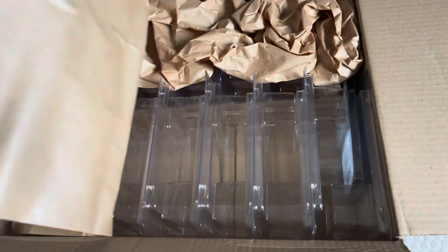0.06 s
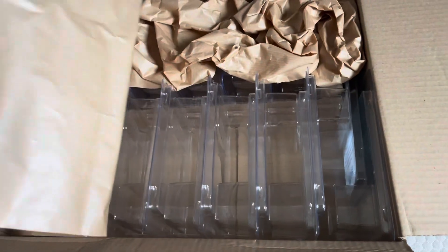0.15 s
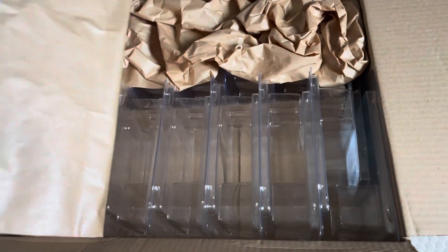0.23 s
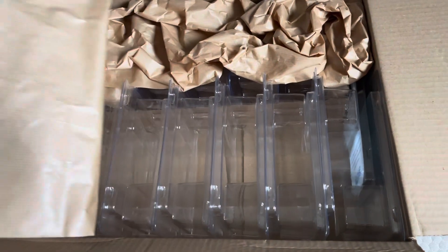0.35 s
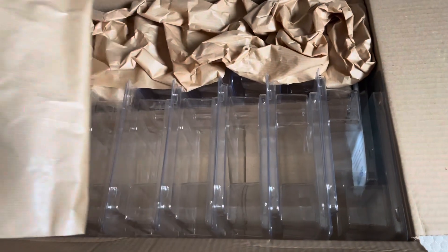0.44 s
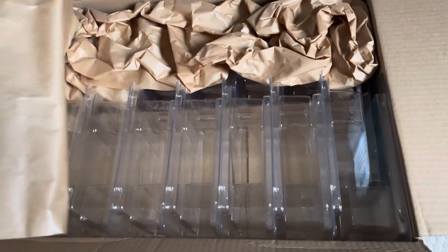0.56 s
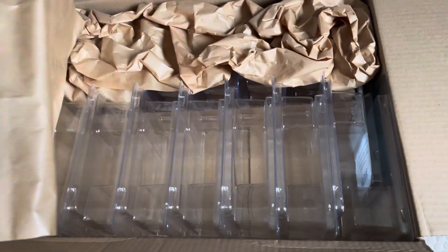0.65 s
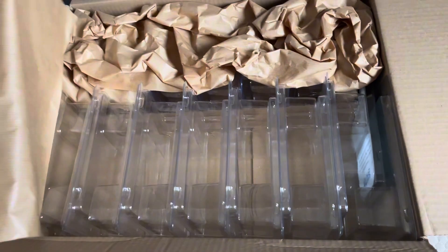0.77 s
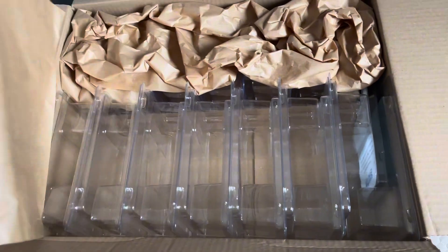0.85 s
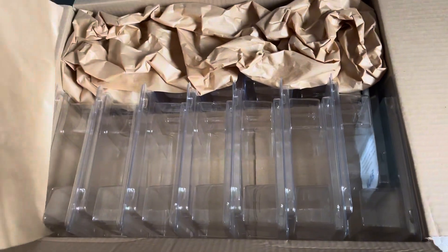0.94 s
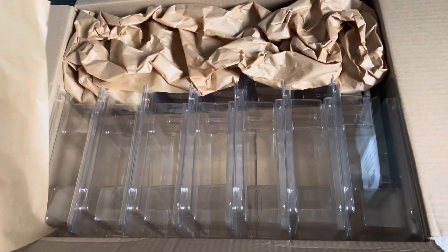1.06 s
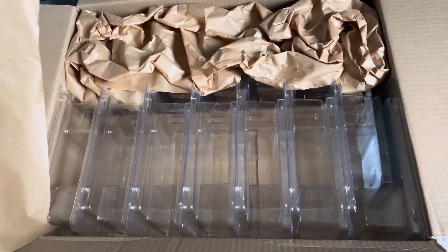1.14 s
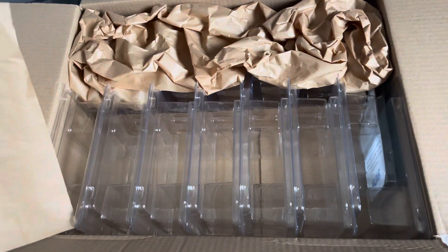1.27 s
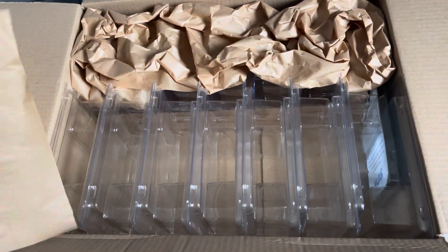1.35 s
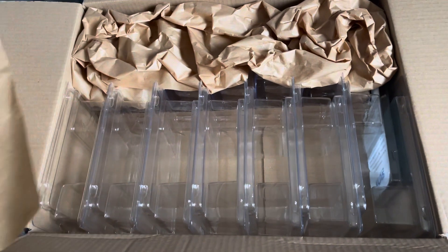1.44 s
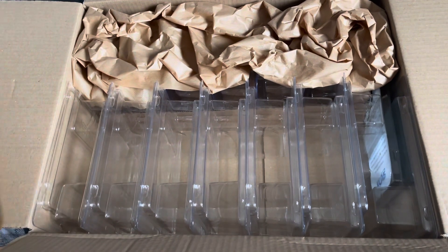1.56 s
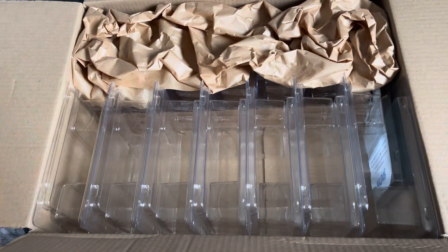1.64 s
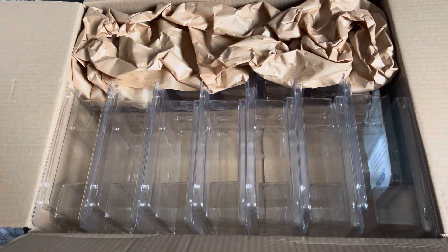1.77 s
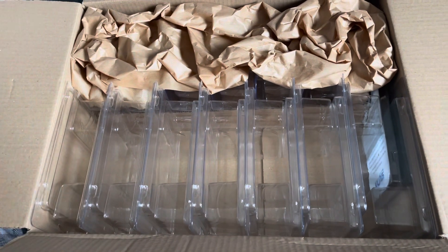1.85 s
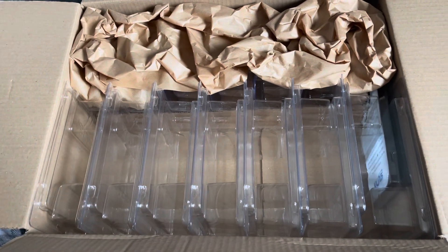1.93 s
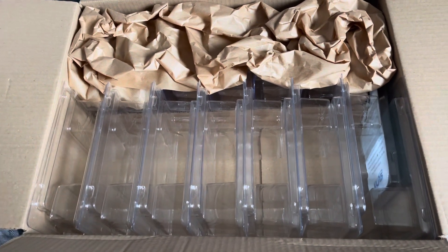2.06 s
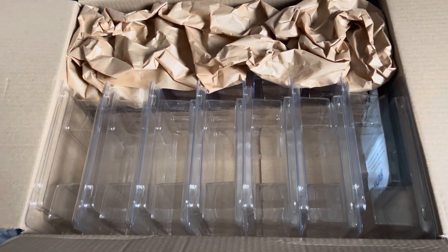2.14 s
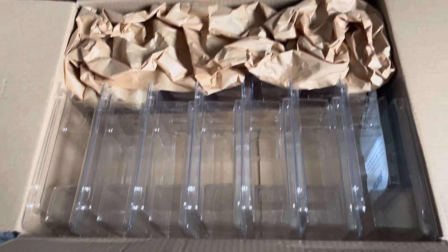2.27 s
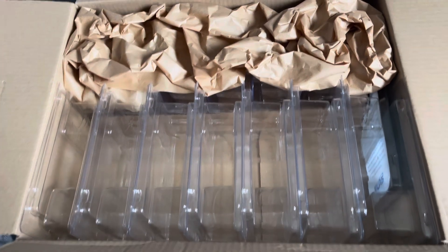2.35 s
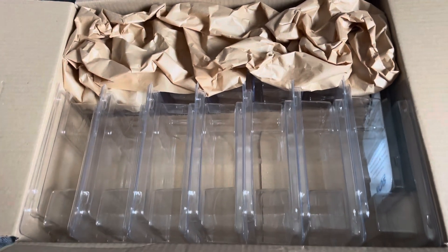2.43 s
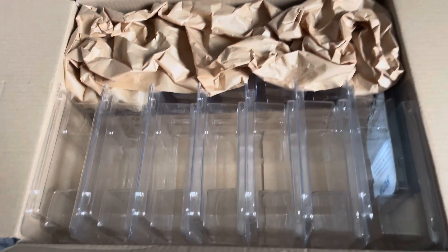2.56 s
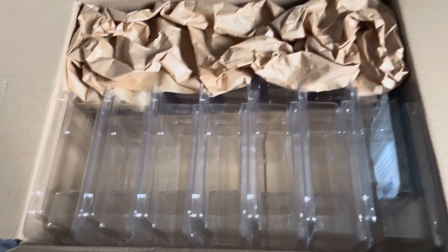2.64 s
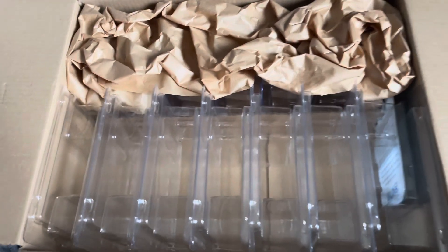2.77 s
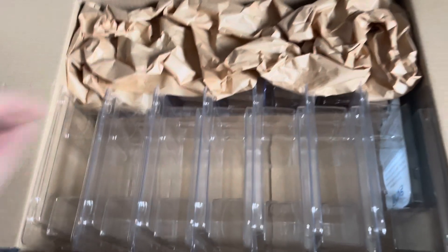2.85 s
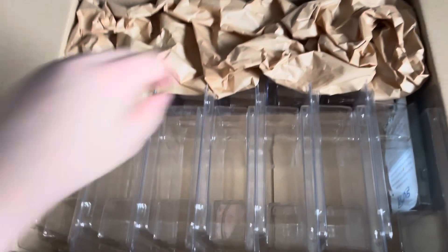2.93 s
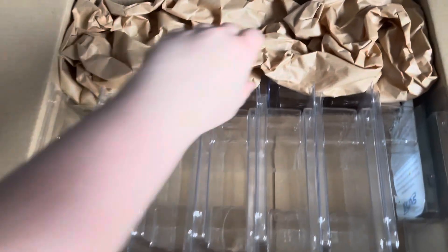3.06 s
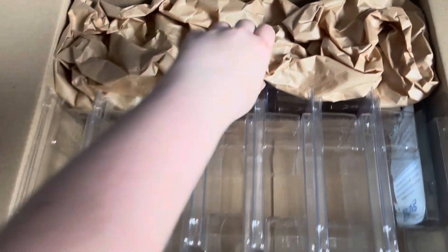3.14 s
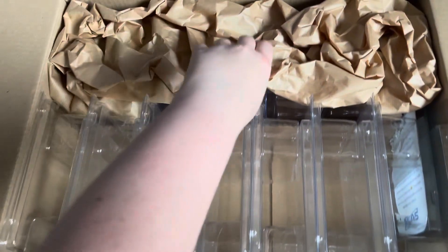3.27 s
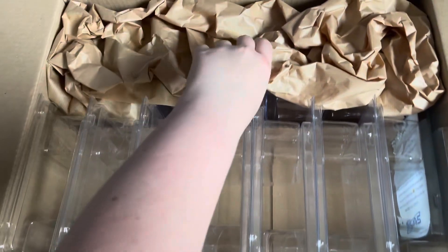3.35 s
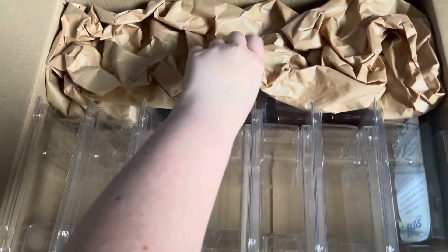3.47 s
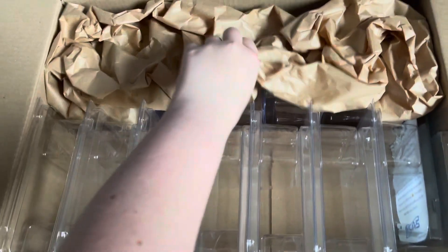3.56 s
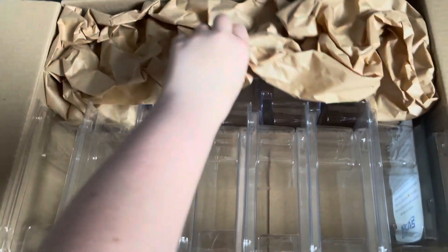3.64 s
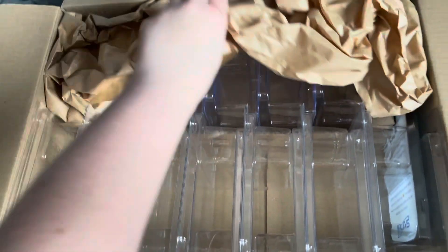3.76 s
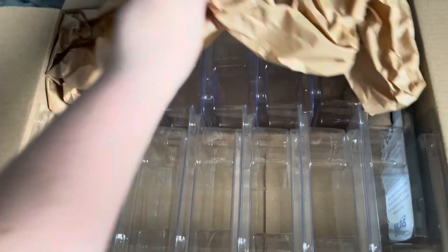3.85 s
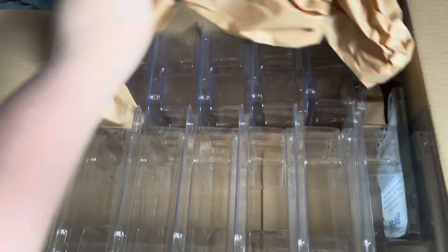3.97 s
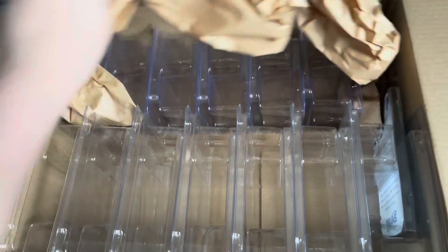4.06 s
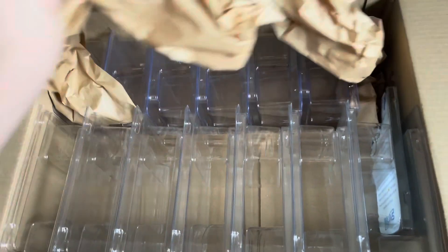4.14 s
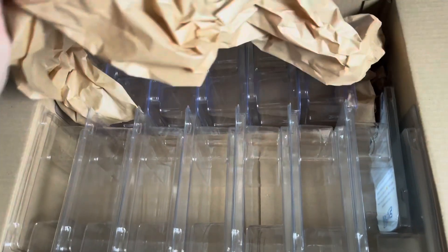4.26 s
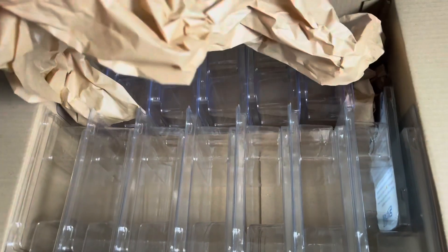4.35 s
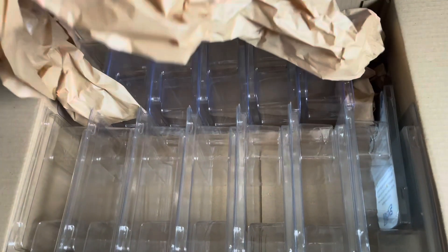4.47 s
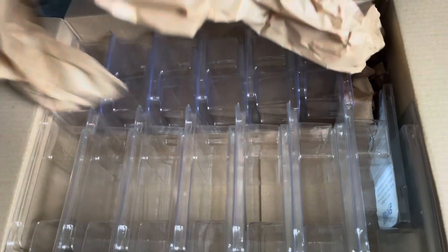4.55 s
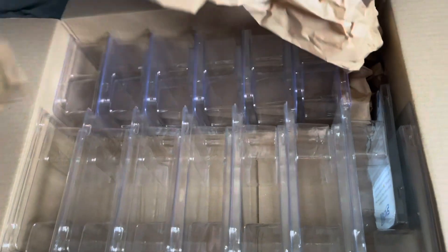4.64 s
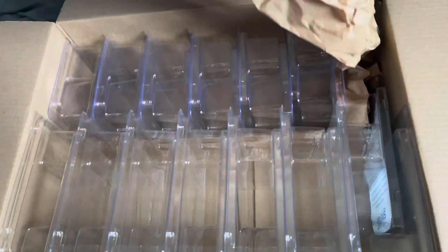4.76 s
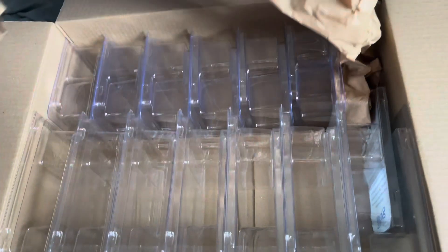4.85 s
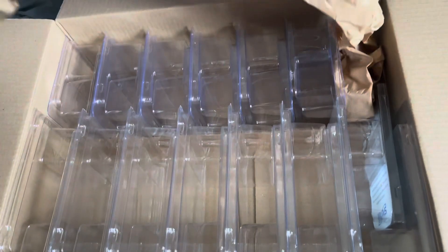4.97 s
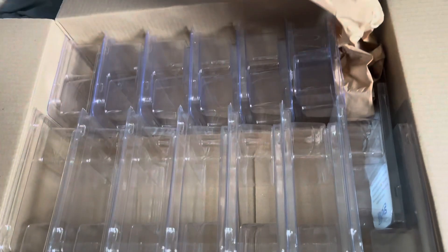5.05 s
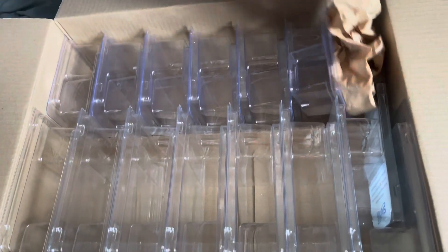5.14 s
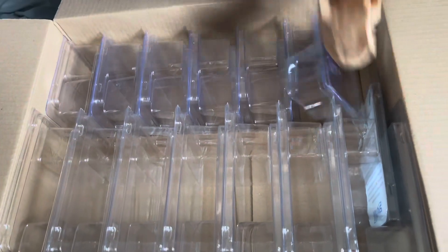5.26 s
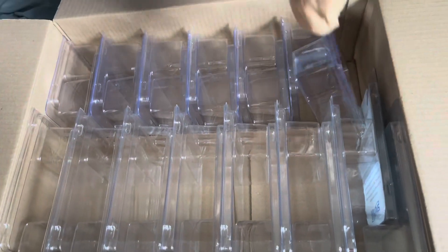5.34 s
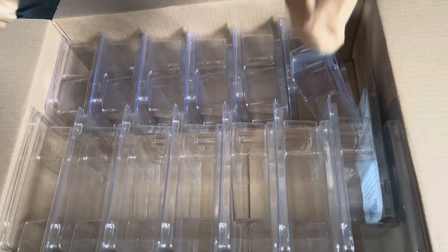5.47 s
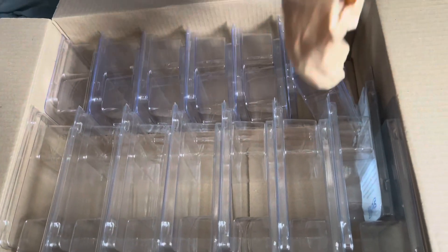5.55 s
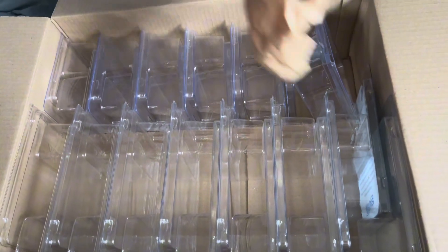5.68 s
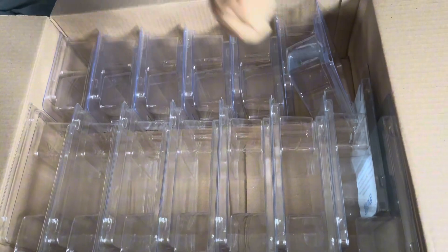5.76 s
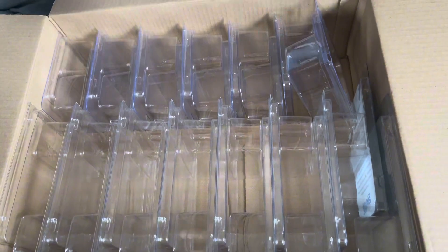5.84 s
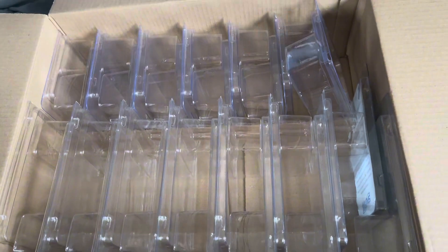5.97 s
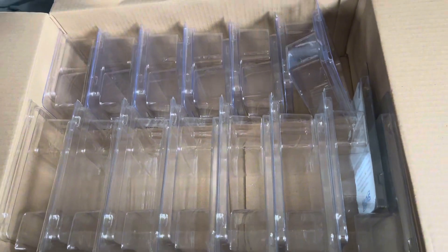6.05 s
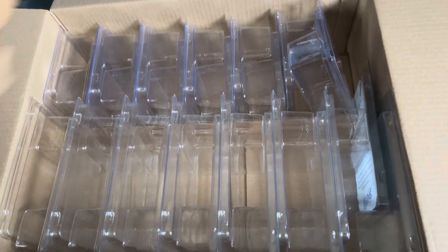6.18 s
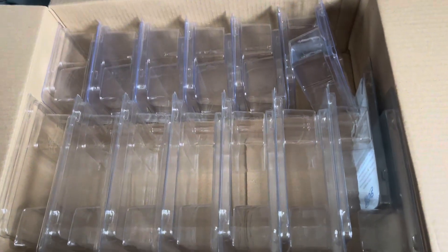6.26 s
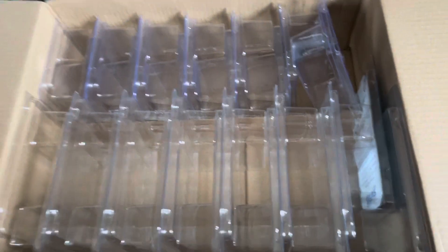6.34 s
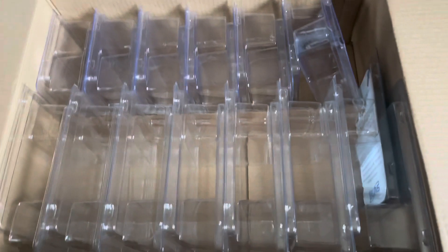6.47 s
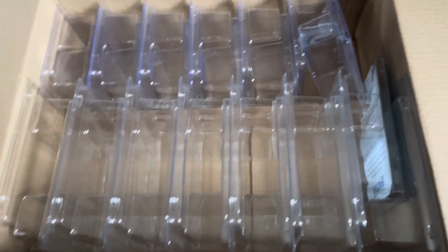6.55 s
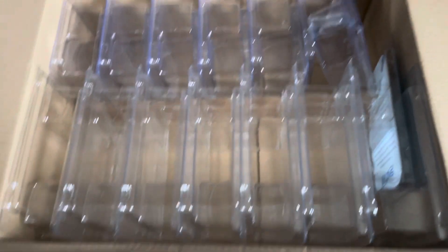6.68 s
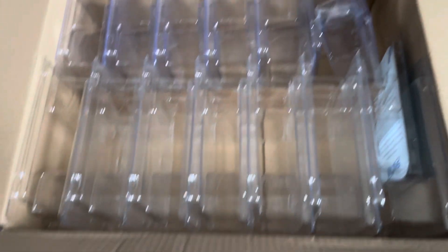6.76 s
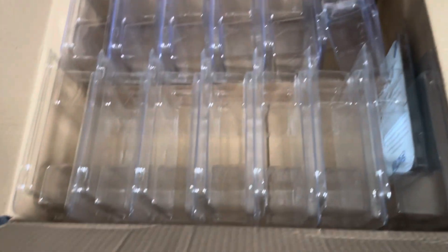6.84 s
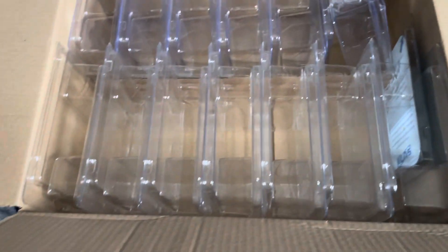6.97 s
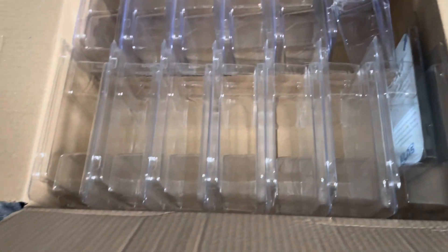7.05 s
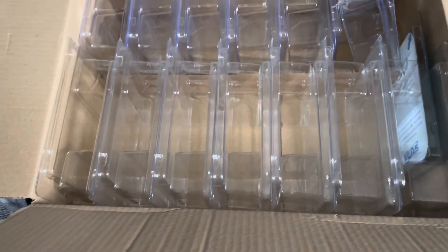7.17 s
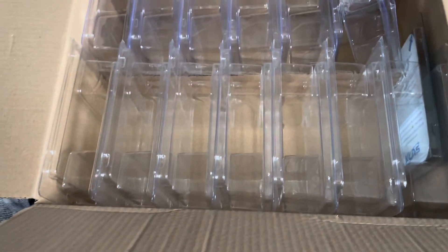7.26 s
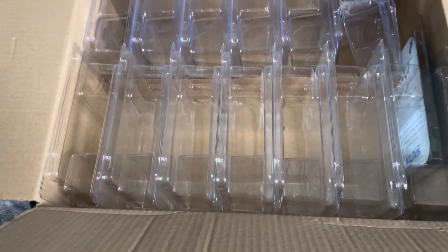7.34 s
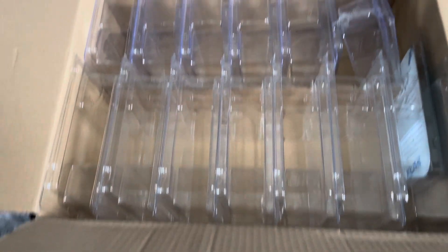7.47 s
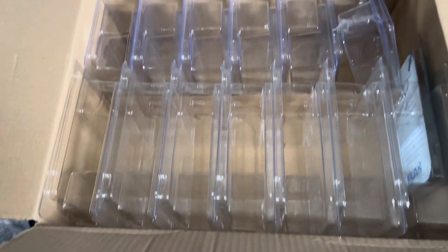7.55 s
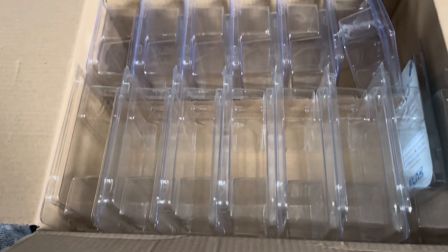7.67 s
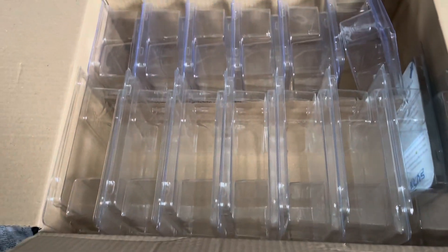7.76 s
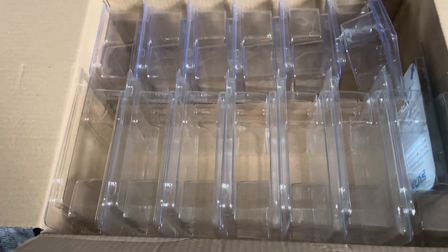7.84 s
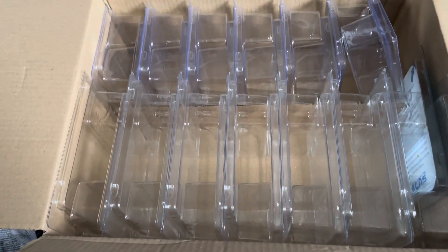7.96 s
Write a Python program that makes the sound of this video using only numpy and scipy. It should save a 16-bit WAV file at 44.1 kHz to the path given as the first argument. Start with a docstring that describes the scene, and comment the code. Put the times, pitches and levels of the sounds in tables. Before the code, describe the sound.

Close to the microphone in a small quiet room, stiff packing paper rustles and snaps, fades, rustles lightly again, then nearly stops with a tiny squeak. A long, loud pull follows, full of crackles, sliding hiss, popping folds and low box thuds, ending in a heavy boom. After a faint lull, softer rustling and quick plastic tray ticks die away.

```python
"""In a small quiet room, crumpled brown paper is drawn out of a cardboard box close to a phone's two ports.
Creases buckle into a grainy rustle and sheets hiss as they slide: noise in bands plus many tiny rings.
Big folds snap (short noise bursts) and broad panels pop (short hollow notes).
The box walls thud (low ringing modes), rumble and boom (low noise); thin plastic trays tick.
A faint squeak wavers in one pause, and the room adds a soft steady noise."""
import sys
import numpy as np
from scipy import signal
from scipy.fft import rfft, irfft, next_fast_len
from scipy.io import wavfile
from scipy.ndimage import uniform_filter1d

SR = 44100
rng = np.random.default_rng(int(sys.argv[2]) if len(sys.argv) > 2 else 0)


def log_audio(samples):
    """Write samples as a 16-bit WAV file to the path given in sys.argv[1]."""
    # one column per channel
    frames = np.atleast_2d(samples).T
    # limit to full scale, then quantise
    limited = np.clip(frames, -1, 1)
    pcm = np.round(limited * 32767).astype(np.int16)
    wavfile.write(sys.argv[1], SR, pcm)


N = 353241
TIME_S = np.arange(N) / SR
SIZE = next_fast_len(N + 8192)  # FFT length, with spare room after the end

# the paper's slow motion, one curve per pull or pause; each point is
# (time_s, rustle_db, sliding_hiss_db, box_rumble_db)
PULLS = [
    [(0.0, -43.5, -48, -40.5), (0.1, -47, -42.5, -43.5), (0.135, -52, -42.5, -53), (0.24, -50.5, -51, -56),
     (0.375, -66, -59, -57), (0.57, -59, -61.5, -63.5), (0.72, -75.5, -75, -81), (0.9, -76, -83, -82),
     (0.99, -55.5, -58, -55)],
    [(1.0, -60, -40, -64), (1.075, -60, -59, -61), (1.28, -53, -51, -62.5), (1.37, -48.5, -45.5, -52),
     (1.52, -49.5, -48, -56.5), (1.59, -54, -47.5, -68.5), (1.99, -61, -47, -64), (2.22, -70, -61, -77),
     (2.345, -67.5, -67, -75), (2.39, -52, -57.5, -60), (2.53, -65, -54.5, -71)],
    [(2.65, -95.5, -95, -87), (2.86, -90, -80.5, -80.5), (3.1, -75.5, -68.5, -79.5), (3.351, -85, -75, -80)],
    [(3.355, -40, -40.5, -42.5), (3.55, -61, -51, -62.5), (3.77, -47, -49, -47.5), (4.0, -44.5, -42.5, -46),
     (4.18, -42.5, -42.5, -45), (4.33, -38.5, -37.5, -39.5), (4.52, -42.5, -47, -44.5),
     (4.575, -43.5, -37, -46.5), (4.73, -49.5, -56, -56.5)],
    [(4.85, -45, -43.5, -49), (4.97, -45.5, -42.5, -52.5), (5.09, -56, -59.5, -51.5),
     (5.21, -51, -44.5, -55), (5.3, -40, -35, -39.5), (5.4, -46, -49.5, -28.5), (5.5, -58.5, -60.5, -61),
     (5.67, -49, -51.5, -59.5), (5.72, -78, -78, -81.5)],
    [(5.78, -64, -63.5, -62), (5.91, -65.5, -72.5, -70.5), (6.08, -63, -56, -68.5),
     (6.18, -69.5, -80, -68.5), (6.33, -77, -83.5, -77), (6.505, -80.5, -82.5, -80.5)],
    [(6.525, -50, -43.5, -48.5), (6.58, -46, -45.5, -53.5), (6.64, -57.5, -57, -62.5),
     (6.94, -51, -49.5, -59.5), (7.08, -48.5, -49, -56.5), (7.105, -44.5, -41, -51),
     (7.22, -47, -45, -53.5), (7.41, -63.5, -66, -65), (7.74, -68, -66.5, -70.5), (8.01, -70, -65, -69.5)],
]
# how the two ports hear: (pitch_hz, likeness from 0 to 1, left_lead_radians, left_minus_right_db)
PORTS = [(60, .988, 0, .6), (200, .982, 0, .4), (400, .94, .05, .9), (750, .79, .15, 1.6),
         (1400, .5, .2, 2.2), (3000, .66, .5, 1.8), (5200, .6, .5, 2.0), (7300, .7, .9, 2.2),
         (8600, .96, -.1, .4), (9500, .95, -1.8, .1), (10200, .994, -3.14, 0), (10900, .95, -4.5, 0),
         (11700, .95, -5.8, -.2), (16000, .8, -6.3, -.2)]


def undb(db):
    """Turn decibels into a gain."""
    return 10 ** (np.asarray(db) / 20)


def unit(x):
    """Scale to an average strength (rms) of 1."""
    return x / np.sqrt(np.mean(x ** 2))


def over_hz(hz, value, size):
    """Read a table at every FFT bin, with straight lines between points on a log-pitch axis."""
    bins_hz = np.fft.rfftfreq(size, 1 / SR)
    return np.interp(np.log(bins_hz + 1), np.log(hz), value)


def colour(x, spectrum):
    """Filter a sound by a (pitch_hz, level_db) curve; white noise takes on that spectrum."""
    size = next_fast_len(x.shape[-1])
    hz, db = np.transpose(spectrum)
    shaped = rfft(x, size) * undb(over_hz(hz, db, size))
    return irfft(shaped, size)[..., :x.shape[-1]]


def fade(t, t60_s):
    """Die away evenly in decibels, by 60 dB in t60_s."""
    return np.exp(-np.log(1000) * t / t60_s)


def add(out, sound, s):
    """Mix a sound in at time s."""
    i = int(s * SR)
    out[..., i:i + sound.shape[-1]] += sound[..., :out.shape[-1] - i]


def creases(per_s, spread_db, t60_s):
    """Loudness curve of random bucklings: many small, a few large, each dying away on its own."""
    when, size = rng.random(N), rng.exponential(size=N)
    kicks = (when < per_s / SR) * undb(2 * spread_db * np.minimum(size, 4.5))
    keep = np.exp(-2 * np.log(1000) / (t60_s * SR))  # share of power left after one sample
    already = [kicks.mean() / (1 - keep)]  # the buckling is under way at the start
    power = signal.lfilter([1], [1, -keep], kicks, zi=already)[0]
    return unit(np.sqrt(power + 1e-12))


def grainy(spectrum, lo_hz, hi_hz, count, shared, own_per_s, own_db, own_t60_s, tilt_db=0):
    """Noise bands that follow shared creases and their own, and drift. Rows: direct, scattered."""
    out = 0
    edges = np.geomspace(lo_hz, hi_hz, count + 1)
    for lo, hi in zip(edges, edges[1:]):
        band_filter = signal.butter(2, [lo, hi], "band", fs=SR, output="sos")
        band = signal.sosfilt(band_filter, rng.standard_normal((2, N)))
        band = band * undb(tilt_db * np.log2(lo / 2000))  # tilt in dB per octave
        own = creases(own_per_s, own_db, own_t60_s)
        # the colour shifts as other sheets take the strain
        drift = creases(per_s=70., spread_db=2, t60_s=0.53)
        out = out + band * own * drift
    return unit(colour(out * shared, spectrum))


def pings(per_s, lo_hz, hi_hz, cycles, spread_db, size):
    """Small facets flip and ring briefly, each at its own pitch. Rows: direct, scattered."""
    chance = rng.random((4000, 5))
    start_s = np.cumsum(-np.log(chance[:, 0])) / per_s  # random gaps
    inside = start_s < N / SR
    chance = chance[inside]
    start = (start_s[inside] * SR).astype(int)
    hz = lo_hz * (hi_hz / lo_hz) ** chance[:, 1:2]
    gain = undb(-spread_db * np.log(chance[:, 2:3] + 0.0023))
    k = np.arange(size)
    # "cycles" is the count at 1 kHz to die by 60 dB; high facets ring for more cycles
    ring = gain * (1 - k / size) * fade(k / SR, cycles / np.sqrt(hz * 1000.))
    place = (start[:, None] + k).ravel()
    rows = []
    for j in (3, 4):  # each row starts its waves at other points
        row = ring * np.sin(2 * np.pi * (hz * k / SR + chance[:, j:j + 1]))
        rows.append(np.bincount(place, row.ravel(), N + len(k))[:N])
    return unit(np.array(rows))


def bursts(steady_db, peaks_s, swells_s, fade_s, peaks_db):
    """Bursts that swell and fade, 20 dB per swell or fade time, added in power to a steady level."""
    after = np.arange(len(steady_db)) / 1000 - np.reshape(peaks_s, (-1, 1))  # one step per millisecond
    swells_s = np.maximum(np.reshape(swells_s, (-1, 1)), 1e-3)
    below = np.where(after < 0, -after / swells_s, after / fade_s)
    burst_db = np.reshape(peaks_db, (-1, 1)) - 20 * below
    power = undb(2 * steady_db) + undb(2 * burst_db).sum(axis=0)
    return 10 * np.log10(power)


def motion():
    """Levels of rustle, hiss, rumble and boom: slow pulls, crunches on top, and the box shifting."""
    # the wad crunching as it is squeezed or catches:
    # (peak_s, swell_s, rustle_db, sliding_hiss_db, box_rumble_db)
    crunches = [(0.055, 0.017, -42, -59.5, -48.5), (0.158, 0.013, -42, -41.5, -48),
                (0.34, 0.072, -46, -47, -50), (0.419, 0.034, -43.5, -51.5, -52.5),
                (0.655, 0.04, -58, -60.5, -54), (0.816, 0.026, -50.5, -52.5, -55.5),
                (1.322, 0.097, -55, -40.5, -74), (1.674, 0.06, -60, -43, -73.5),
                (1.767, 0.055, -55, -67, -48), (2.037, 0.032, -56, -43.5, -59),
                (2.559, 0.039, -50.5, -46.5, -62.5), (3.656, 0.089, -35, -30, -43.5),
                (3.921, 0.091, -35, -31.5, -55), (4.268, 0.01, -31, -42, -54),
                (4.298, 0.015, -39, -44, -60), (4.653, 0.21, -43.5, -34, -53.5),
                (5.164, 0.011, -39, -42, -34), (5.244, 0.022, -34, -42.5, -32.5),
                (5.278, 0.019, -38.5, -46, -42), (6.001, 0.06, -54, -72, -53.5),
                (6.201, 0.009, -61.5, -53, -67), (7.334, 0.05, -56, -62.5, -52.5),
                (7.655, 0.026, -57, -52, -76)]
    # the whole box shifting: (peak_s, swell_s, boom_db)
    shifts = [(0.24, 0.11, -43.5), (0.67, 0.053, -59.5), (1.02, 0.033, -53.5), (1.14, 0.04, -57.5),
              (1.4, 0.16, -57), (1.55, 0.078, -54), (3.37, 0.0064, -45), (3.41, 0.028, -52),
              (3.67, 0.12, -44), (3.92, 0.035, -42), (5.26, 0.027, -36), (5.41, 0.12, -39),
              (6.56, 0.026, -50.5), (7.85, 0.14, -67)]
    ms = np.arange(0, N / SR, .001)
    s, *steady = np.transpose(np.concatenate(PULLS))
    peak_s, swell_s, *peak_db = np.transpose(crunches)
    levels = []
    for slow_db, crunch_db in zip(steady, peak_db):
        slow = np.interp(ms, s, slow_db)
        levels.append(bursts(slow, peak_s, swell_s, fade_s=0.06, peaks_db=crunch_db))
    shift_s, swell_s, shift_db = np.transpose(shifts)
    steady_boom = levels[-1] - 9.5  # between shifts the boom stays this many dB under the rumble
    levels.append(bursts(steady_boom, shift_s, swell_s, fade_s=0.092, peaks_db=shift_db))
    return [np.interp(TIME_S, ms, db) for db in levels]


def room():
    """The room's faint steady noise, strongest in the low pitches."""
    # colour of the room noise: (pitch_hz, level_db)
    room_colour = [(25, -10), (60, 8), (150, 0), (400, -14), (900, -19.5), (2000, -20.5), (4500, -28.5),
                   (9000, -21.5), (11800, -30), (13000, -63.5)]
    return undb(-75) * unit(colour(rng.standard_normal((2, N)), room_colour))


def squeak():
    """A thin tone whose pitch and strength flutter together."""
    # path of the squeak before the flutter: (time_s, pitch_hz, level_db)
    squeak_path = [(2.88, 1870, -92), (2.915, 1990, -82), (2.932, 2050, -84), (2.952, 1810, -81),
                   (2.962, 1610, -78), (2.99, 1690, -89), (3.003, 1820, -77), (3.042, 1870, -72),
                   (3.053, 1875, -85), (3.09, 1890, -94), (3.11, 1900, -78), (3.13, 1700, -90)]
    s, hz, db = np.transpose(squeak_path)
    flutter = unit(uniform_filter1d(rng.standard_normal(N), size=400))
    level = undb(np.interp(TIME_S, s, db, left=-200, right=-200) + 3.1 * flutter)
    pitch_hz = np.interp(TIME_S, s, hz) * (1 + 0.0124 * flutter)
    tone = level * np.sin(2 * np.pi * np.cumsum(pitch_hz) / SR)
    return [[1], [0]] * tone  # direct sound only


def ticks():
    """Tilting the box ticks the trays: the same few modes, each a little detuned and rebalanced."""
    # ticks of the thin plastic trays: (start_s, peak_db)
    tick_list = [(6.6675, -34), (6.708, -38), (6.7304, -35), (6.756, -32), (6.8019, -40), (6.822, -46),
                 (6.8428, -44), (6.8594, -37), (6.939, -35)]
    # ringing modes of a tray: (pitch_hz, level_db, time_to_fade_60_db_s)
    tray = [(2745, -4, 0.016), (4900, -4.5, 0.011), (6360, -6, 0.0088), (8200, -2, 0.0088)]
    out = np.zeros((2, N))
    t = np.arange(int(.05 * SR)) / SR
    hz, mode_db, t60 = np.transpose(tray)[..., None]
    changes = rng.standard_normal((len(tick_list), 4, len(tray), 1))
    for (s, db), (detune, weight, *turn) in zip(tick_list, changes):
        waves = np.sin(2 * np.pi * (hz * (1 + 0.029 * detune) * t + np.array(turn)))
        ring = (undb(mode_db + 2.4 * weight) * fade(t, t60) * waves).sum(axis=1)
        add(out, undb(db) * ring / np.abs(ring).max(), s)
    return out


def skim():
    """A flat sheet skims the box edge: a smooth hiss in one narrow high band."""
    # loudness of the skim: (time_s, level_db)
    skim_level = [(4.78, -71), (4.87, -45), (5.0, -45), (5.04, -72)]
    # its colour: (pitch_hz, level_db)
    skim_colour = [(7300, -30), (7900, 1), (9200, 11), (9900, -33)]
    s, db = np.transpose(skim_level)
    level = undb(np.interp(TIME_S, s, db, left=-200, right=-200))
    return level * unit(colour(rng.standard_normal((2, N)), skim_colour))


def flaps():
    """Broad panels pop over: each rings briefly at its own pitch, with a rough close partner."""
    # popping panels: (start_s, level_db, pitch_hz)
    flap_list = [(0.002, -34.5, 231), (0.004, -30.5, 470), (0.047, -35, 350), (0.089, -32, 546),
                 (0.151, -37.5, 514), (0.178, -32.5, 860), (0.425, -42, 472), (1.313, -36, 834),
                 (3.365, -31, 584), (3.387, -33.5, 370), (3.461, -36.5, 434), (3.709, -35.5, 463),
                 (3.709, -30.5, 1010), (3.86, -29, 960), (3.94, -23, 1130), (4.153, -28, 940),
                 (4.263, -20, 805), (4.308, -27, 490), (4.367, -38.5, 412), (5.162, -31.5, 720),
                 (5.274, -24, 311), (5.342, -27.5, 318), (5.365, -26, 585), (5.394, -29.5, 204),
                 (6.972, -35.5, 950), (7.037, -39.5, 560), (7.326, -34, 494)]
    out = np.zeros((2, N))
    t = np.arange(int(.2 * SR)) / SR
    for (s, db, hz), turn in zip(flap_list, rng.random((len(flap_list), 4))):
        note = np.sin(2 * np.pi * (hz * t + turn[:2, None]))
        note = note + 0.2 * np.sin(2 * np.pi * (1.17 * hz * t + turn[2:, None]))
        # rises in 1.6 ms and dies by 60 dB in 21.3 cycles
        shape = np.minimum(t / 0.0016, 1) * fade(t, 21.3 / hz)
        add(out, undb(db) * note * shape, s)
    return out


def box(rumble_db, boom_db):
    """The walls ring low when knocked, rumble while the paper drags and boom when the box shifts."""
    # knocks on the walls: (start_s, level_db, favoured_pitch_hz)
    thuds = [(0.05, -26, 353), (0.239, -33, 120), (1.745, -35, 167), (1.796, -37, 166), (1.868, -35.5, 190),
             (2.02, -41, 167), (3.361, -19, 106), (3.913, -23, 493), (4.022, -25.5, 200),
             (4.289, -24.5, 477), (4.392, -19.5, 220), (5.049, -31.5, 296), (5.133, -20.5, 202),
             (5.243, -18, 378), (5.399, -11, 121)]
    # ringing modes of the walls: (pitch_hz, level_db, time_to_fade_60_db_s)
    modes = [(119.3, -5.5, 0.091), (167, -4, 0.13), (207, -3, 0.06), (390, 1.5, 0.041), (479, -3.5, 0.046),
             (533, 1.5, 0.052)]
    # colour of the rumble: (pitch_hz, level_db)
    rumble_colour = [(90, -39.5), (160, -3.5), (220, -1.5), (330, -2.5), (500, -3.5), (800, -9),
                     (1200, -13), (2000, -39.5)]
    # colour of the boom: (pitch_hz, level_db)
    boom_colour = [(25, -27), (40, -15.5), (52, 5), (70, 0), (112, 9.5), (160, -4.5), (260, -60)]
    rumble = grainy(rumble_colour, 93.8, 1800., shared=1., count=6,
                    own_per_s=80.0, own_db=2.5, own_t60_s=0.24)
    low_pings = pings(per_s=90., lo_hz=176.2, hi_hz=1131.0, cycles=110.0, spread_db=3.0, size=5000)
    boom = unit(colour(rng.standard_normal((2, N)), boom_colour))
    out = undb(rumble_db) * rumble + undb(rumble_db - 12.0) * low_pings + undb(boom_db) * boom
    t = np.arange(int(.3 * SR)) / SR
    for s, db, near_hz in thuds:
        detune = 1 + 0.028 * rng.standard_normal(len(modes))
        turn = rng.random(len(modes))
        knock = 0
        for (hz, mode_db, t60), d, p in zip(modes, detune, turn):
            # the place of the blow favours the modes near one pitch
            gain = undb(mode_db - 6.1 * abs(np.log2(hz / near_hz)))
            knock = knock + gain * fade(t, t60) * np.sin(2 * np.pi * (hz * d * t + p))
        soft_start = 1 - np.exp(-t / 0.01)  # cardboard gives softly
        add(out[0], undb(db) * knock * soft_start, s)
    return out


def snaps():
    """A fold lets go in a few milliseconds around its own pitch; the sheet shivers after it."""
    # folds giving way: (start_s, peak_db, ring_pitch_hz,
    # broad_crack_db against the ring, shiver_db against the burst)
    snap_list = [(0.0457, -7.5, 9260, 27, -6), (0.1473, -31.5, 4560, -7, 10), (0.216, -18.5, 8000, 10, -5),
                 (0.294, -21, 5500, 5, -4), (0.4194, -34, 3730, -21, -29), (0.648, -40, 8510, 14, -3),
                 (0.812, -35.5, 5800, 1, -14), (0.9118, -46.5, 2570, 5, 0), (0.9947, -17.5, 5160, 10, 1),
                 (1.119, -37.5, 8410, 9, -17), (1.3023, -29.5, 9400, 15, 11), (1.317, -22, 7630, 15, 7),
                 (1.401, -32.5, 2530, -1, 0), (1.4296, -24.5, 2220, 2, 6), (1.485, -30, 2860, 8, 1),
                 (1.5093, -20.5, 2060, 9, -1), (1.743, -21, 2690, -2, -18), (2.3248, -41.5, 2880, 5, 12),
                 (2.357, -29, 2030, 6, 3), (2.547, -32.5, 8620, 15, 3), (2.707, -54.5, 1384, -5, -14),
                 (2.842, -54.5, 1360, -8.5, -9), (3.402, -22.5, 2360, 4, 1), (3.6458, -12, 2190, 7, -9),
                 (3.658, -16, 5500, 13, -6), (3.668, -21.5, 4050, -1, 2), (3.708, -22, 8860, 4, -11),
                 (3.7553, -19, 1650, -3.5, -15), (3.861, -20, 3350, 14, 12), (3.914, -17.5, 9800, -24, 3),
                 (3.9879, -11, 7500, 2, -9), (4.109, -21.5, 3900, 18, -21), (4.229, -14, 9200, 6, -3),
                 (4.2628, -15, 1320, -0.5, -5), (4.286, -13, 3200, 0, -13), (4.355, -22.5, 9150, 7, 12),
                 (4.451, -12.5, 3860, 20, -6), (4.5032, -22, 1410, -24, 0), (4.5037, -21, 4100, -14, -13),
                 (4.5282, -4.5, 8300, -0.5, -14), (4.556, -23, 3030, 2.5, 2), (4.589, -21.5, 9200, 19, 15),
                 (4.637, -6.5, 9350, -4.5, -30), (5.16, -12.5, 10820, -1.5, -16),
                 (5.236, -14.5, 1160, 7.5, 3), (5.2722, -11.5, 2820, 3, -4), (5.274, -13, 970, -8, -7),
                 (5.294, -18, 8550, 4, -20), (5.363, -24, 940, -4, -10), (5.3872, -22, 1790, 1, -5),
                 (5.5398, -30.5, 8850, 1.5, -26), (5.591, -28.5, 1090, 0, 11), (5.664, -27, 8700, 1, -28),
                 (5.666, -33.5, 1600, -18, -15), (5.782, -49, 1820, 0.5, -9), (5.965, -38.5, 1320, 6, 6),
                 (5.9967, -34, 6000, -6.5, -9), (6.192, -42, 4100, 5.5, -21),
                 (6.5108, -43.5, 2810, 5.5, -14), (6.539, -31, 7900, 14, -9), (6.555, -26.5, 9600, -4, 5),
                 (6.571, -33.5, 2270, -11, -8), (6.8738, -32, 3760, 11, 16), (6.951, -27, 6050, -1, 6),
                 (7.084, -22.5, 2420, -0.5, -4.5), (7.0842, -21, 4770, 6, -14), (7.1906, -28, 2200, 1, 6),
                 (7.274, -39, 7500, -2, -12), (7.326, -39, 1300, -15, -15), (7.649, -30, 5420, 0, -5.5),
                 (7.7733, -32.5, 1320, -8, 1), (7.7728, -39.5, 2780, -6, -8), (7.7743, -51, 4050, -12, -22),
                 (7.81, -40, 2450, -6, 7), (7.8776, -43.5, 3060, 8, 8), (7.895, -49.5, 2360, -3, 8)]
    # colour of the broad crack: (pitch_hz, level_db)
    crack_colour = [(300, -15), (1000, -9), (3000, -1), (8000, -0.5), (10500, 7), (12500, -10),
                    (13300, -41.5), (16500, -54)]
    out = np.zeros((2, N))
    t = np.arange(int(.15 * SR)) / SR
    burst = np.minimum(t / 0.0011, 1) * fade(t, 0.42) / (1 + (t / 0.0026) ** 6)
    shiver = np.minimum(t / 0.00088, 1) * fade(t, 0.089)
    for s, db, hz, broad_db, shiver_db in snap_list:
        noise = rng.standard_normal((2, 2, len(t)))
        # each fold has peaks and dips of its own across its crack, about 3.5 dB
        lump_db = 3.5 * np.append(rng.standard_normal(15), 0)
        lumps = np.transpose([np.linspace(500, 9000, num=16), lump_db])
        ring_colour = [(hz / 1.3, -36), (hz / 1.26, -5), (hz, 0),
                       (hz + 900, -5), (hz + 3200, -30), (hz + 6000, -70)]
        ring = unit(colour(noise[0], ring_colour))
        crack = unit(colour(colour(noise[1], crack_colour), lumps))
        snap = (ring + undb(broad_db) * crack) * (burst + undb(shiver_db) * shiver)
        add(out, undb(db) * snap / np.abs(snap).max(axis=1, keepdims=True), s)
    return out


def paper(rustle_db, hiss_db):
    """Creases buckle all over the wad while the sheets slide on each other."""
    # spells when flat sheets mostly slide: (start_s, end_s); one that ends before it starts is empty
    slides = [(2.65, 3.34), (4.76, 4.6), (7.42, 8.1)]
    # brightness of the rustle, one value for each pull: tilt in dB per octave
    bright = [0.79, 2.3, 0.24, 0, 0, 0, 2.8]
    # colour of the rustle: (pitch_hz, level_db)
    rustle_colour = [(350, -11.5), (700, 6), (1200, 5), (2200, 6.5), (3800, 1.5), (6000, -7), (8500, -17.5)]
    # colour of the sliding hiss: (pitch_hz, level_db)
    hiss_colour = [(3500, -13.5), (6000, -9.5), (7400, -8), (8700, -3.5), (10300, 0), (11500, -5.5),
                   (12400, -30.5), (13000, -54), (16000, -64.5)]
    wad = creases(per_s=440.0, spread_db=6.5, t60_s=0.041)
    sliding = np.any([(TIME_S > a) & (TIME_S < b) for a, b in slides], axis=0)
    wad = wad ** np.where(sliding, 0.45, 1)  # a slide evens out the crackle
    pull_starts = [pull[0][0] for pull in PULLS]
    pull_now = np.searchsorted(pull_starts, TIME_S, "right") - 1
    tilt_db = uniform_filter1d(np.array(bright, float)[pull_now], size=2000)
    # powers below 1 soften the shared ups and downs
    rustle = grainy(rustle_colour, 248.0, 9360.0, shared=wad ** 0.31, count=10,
                    own_per_s=180.0, own_db=2.5, own_t60_s=0.16, tilt_db=tilt_db)
    facets = pings(per_s=440.0, lo_hz=485.0, hi_hz=9760.0, cycles=45.0, spread_db=9.5, size=1400)
    # small dry crinkles, silent in a slide
    crinkles = pings(per_s=300., lo_hz=1000., hi_hz=7300.0, cycles=9.9, spread_db=4.5, size=700)
    rustle = rustle + undb(-20.5) * facets + undb(-11.0) * ~sliding * crinkles
    hiss = grainy(hiss_colour, 3000., 13470.0, shared=wad ** 0.33, count=6,
                  own_per_s=98.0, own_db=3.0, own_t60_s=0.56)
    return undb(rustle_db) * rustle + undb(hiss_db) * hiss


def scene():
    """Mix all sources; each port hears the direct sound plus scatter of opposite sign."""
    rustle_db, hiss_db, rumble_db, boom_db = motion()
    mix = room() + squeak() + ticks() + skim() + flaps()
    mix = mix + box(rumble_db, boom_db) + snaps() + paper(rustle_db, hiss_db)
    direct, scattered = rfft(mix, SIZE)
    hz, alike = np.transpose(PORTS)[:2]
    alike = np.clip(over_hz(hz, alike, SIZE), 0, 1)
    same = np.sqrt((1 + alike) / 2) * direct
    opposite = np.sqrt((1 - alike) / 2) * scattered * [[1], [-1]]
    return irfft(same + opposite, SIZE)[:, :N]


def record(dry):
    """The ports differ in loudness and timing with pitch; a steep filter removes the top."""
    hz, _, lead, balance_db = np.transpose(PORTS)
    tilt = undb(over_hz(hz, balance_db, SIZE) / 2)  # half the difference goes to each side
    left = tilt * np.exp(1j * over_hz(hz, lead, SIZE))
    heard = irfft(rfft(dry, SIZE) * [left, 1 / tilt], SIZE)[:, :N]
    top_cut = signal.ellip(10, .2, 80, 16400, fs=SR, output="sos")  # low-pass edge in Hz
    return signal.sosfilt(top_cut, heard)


dry = scene()
out = record(dry)
log_audio(out)
```